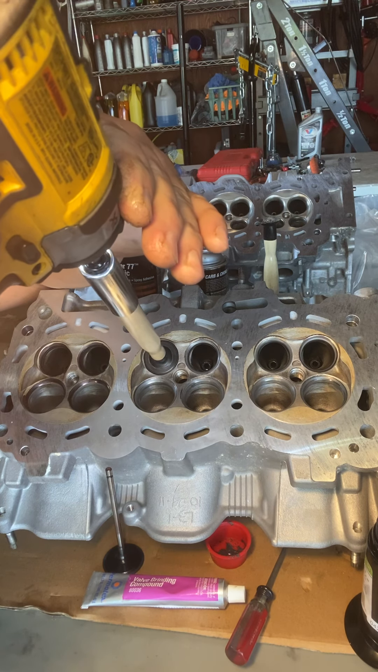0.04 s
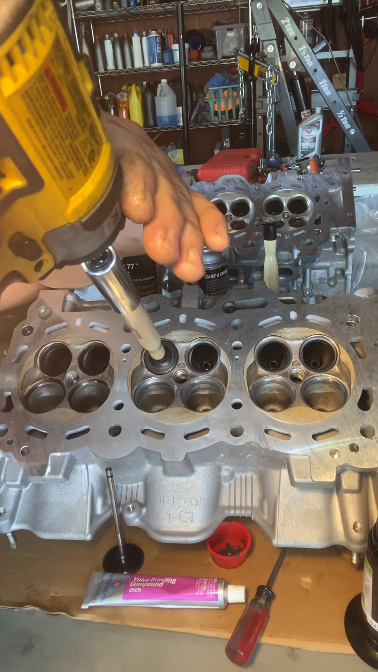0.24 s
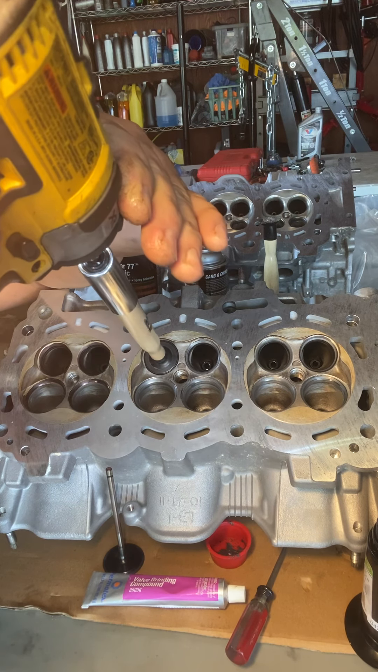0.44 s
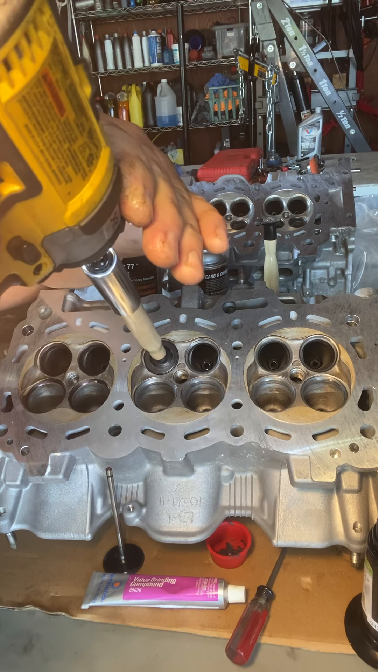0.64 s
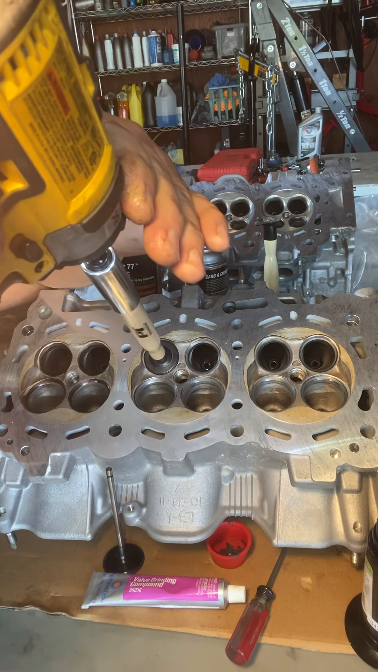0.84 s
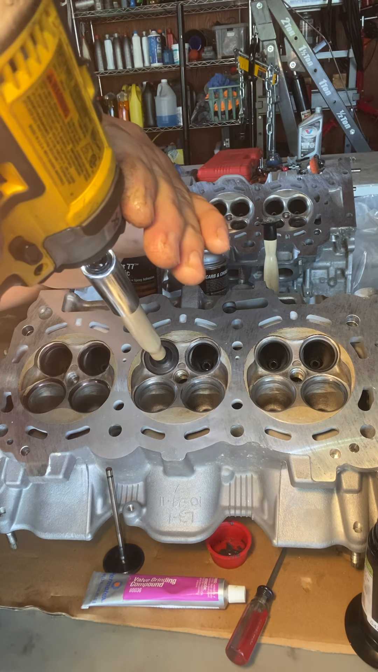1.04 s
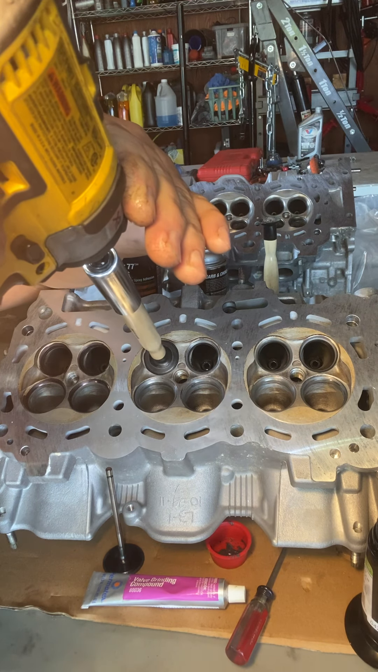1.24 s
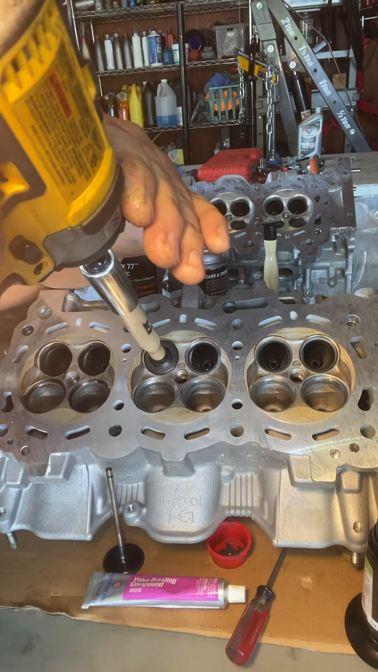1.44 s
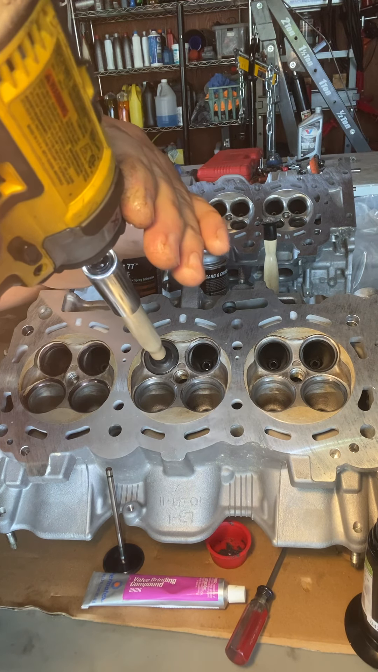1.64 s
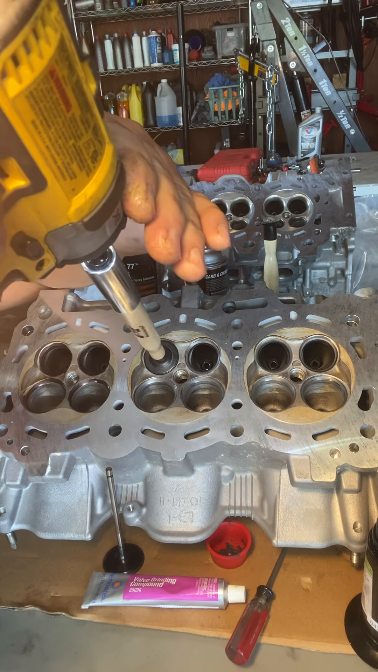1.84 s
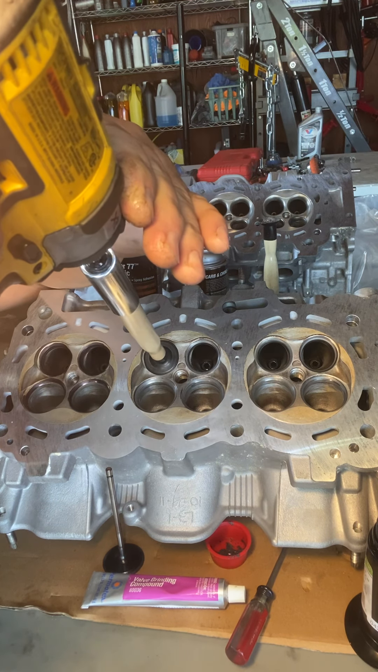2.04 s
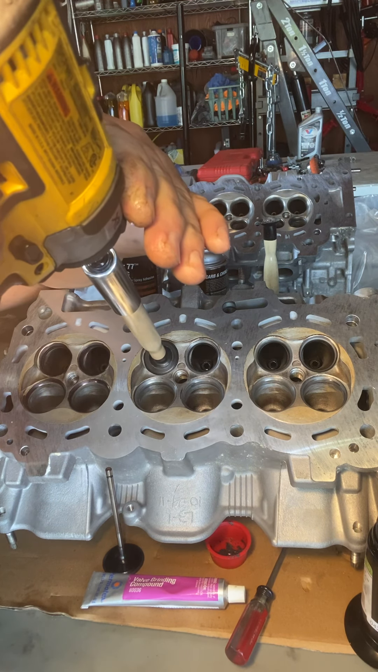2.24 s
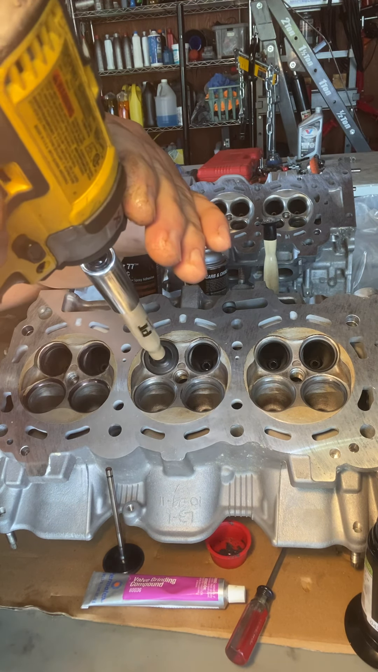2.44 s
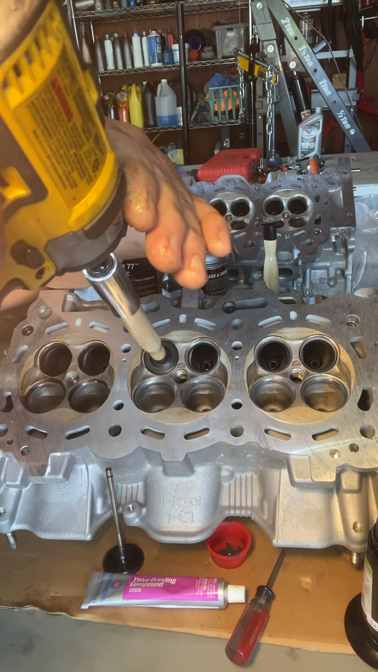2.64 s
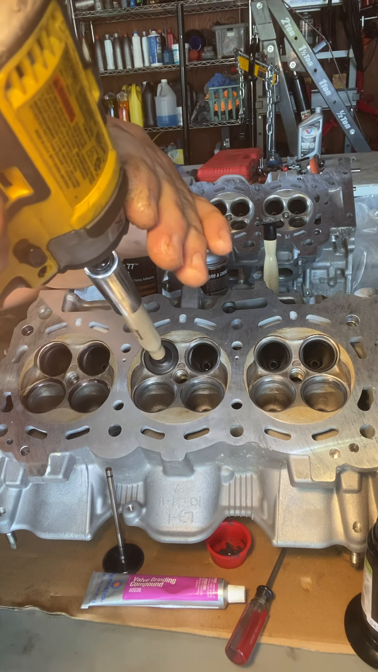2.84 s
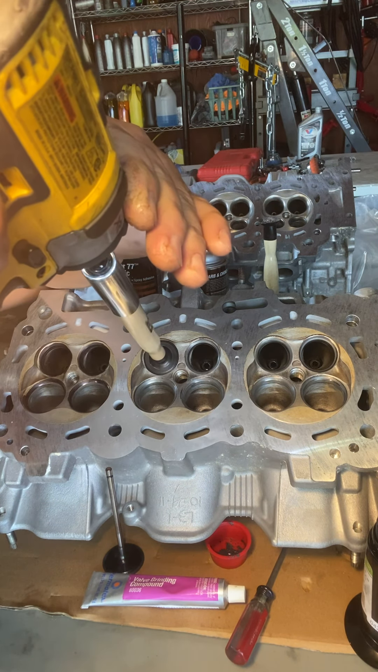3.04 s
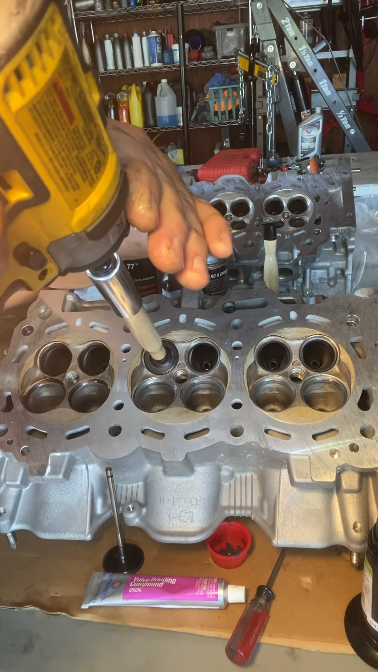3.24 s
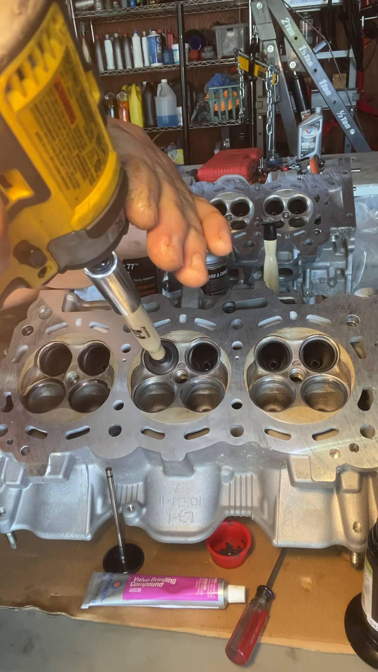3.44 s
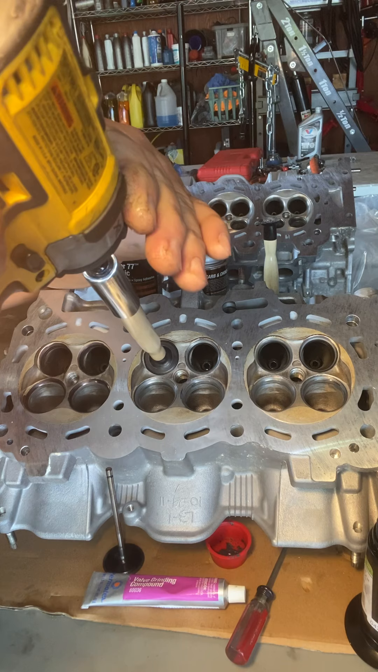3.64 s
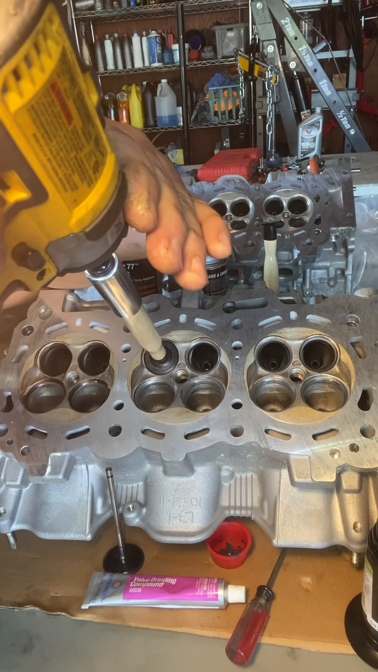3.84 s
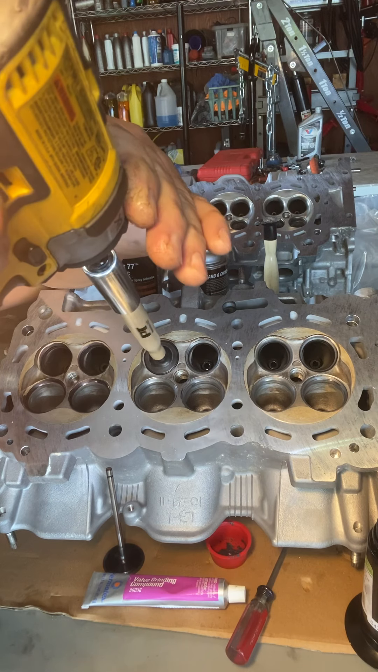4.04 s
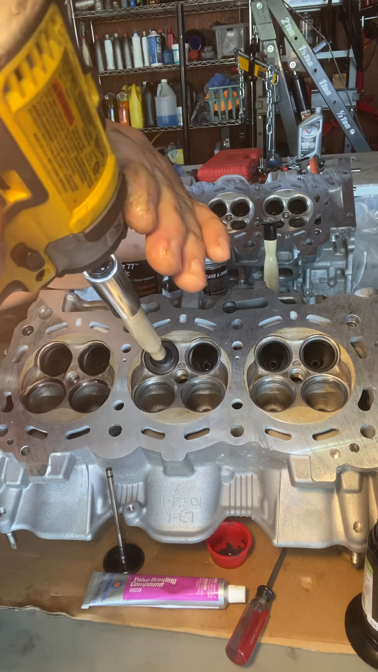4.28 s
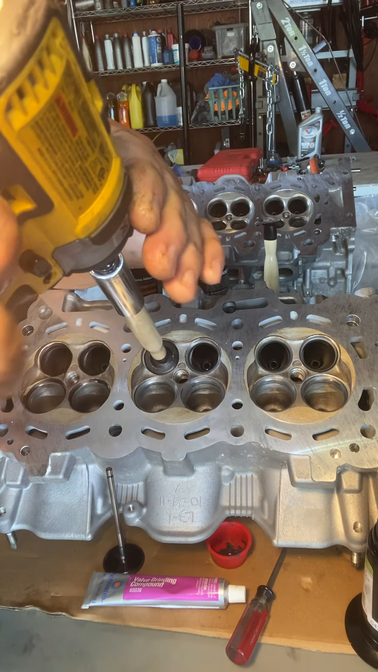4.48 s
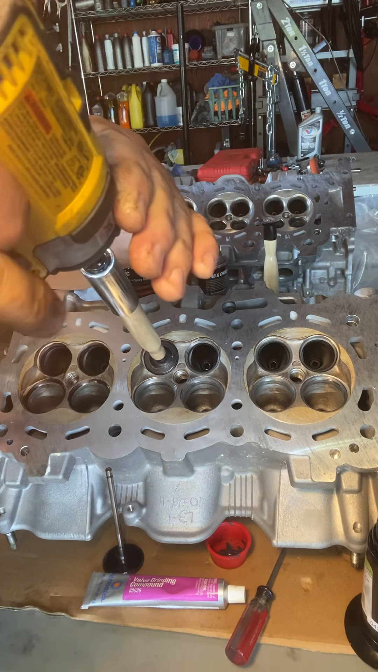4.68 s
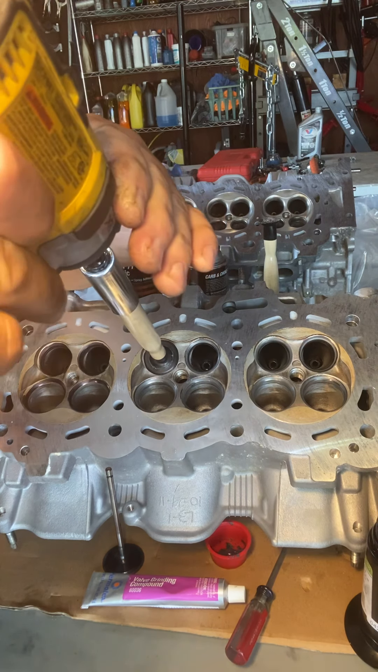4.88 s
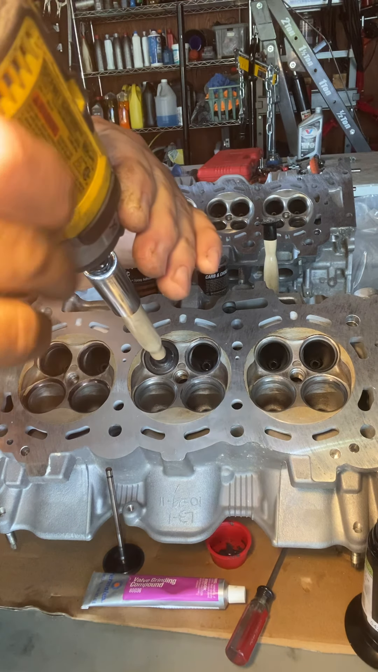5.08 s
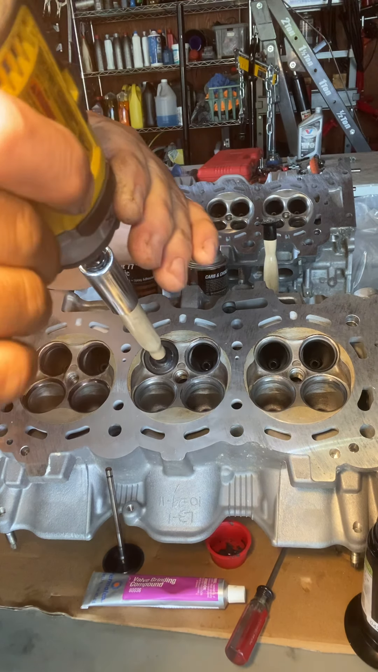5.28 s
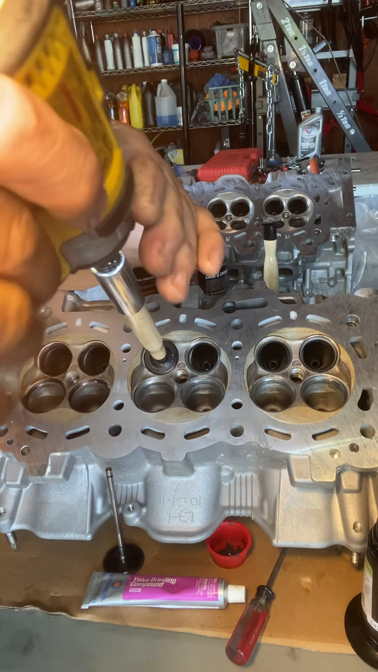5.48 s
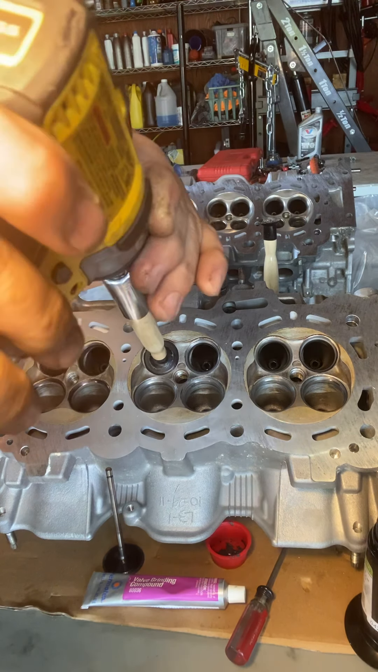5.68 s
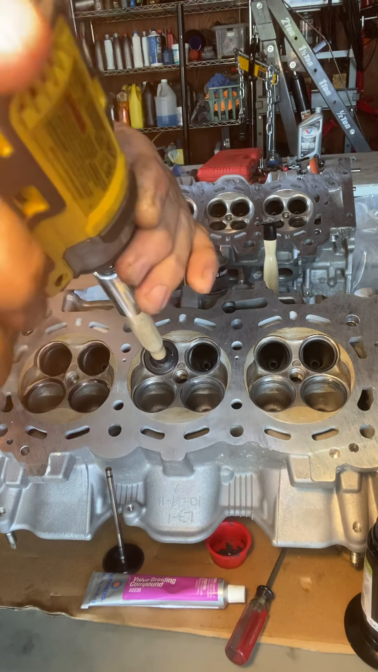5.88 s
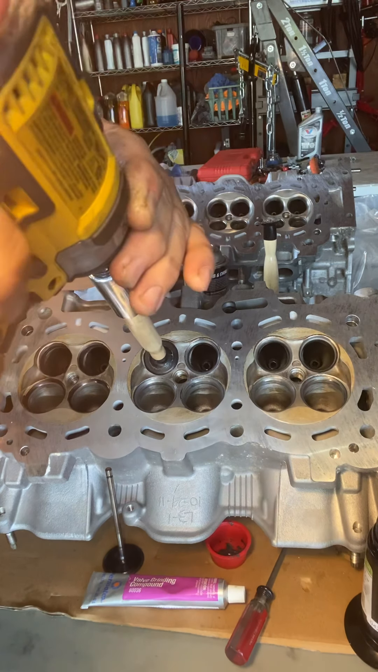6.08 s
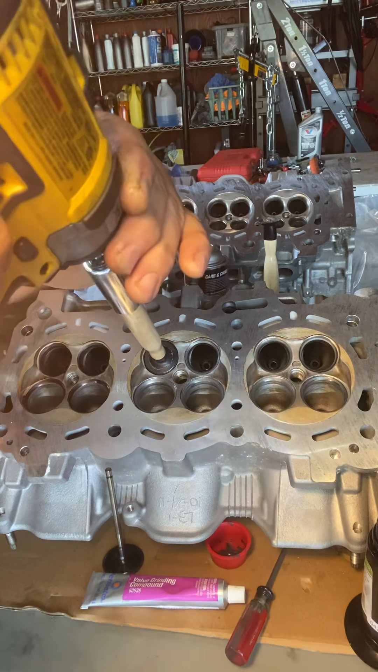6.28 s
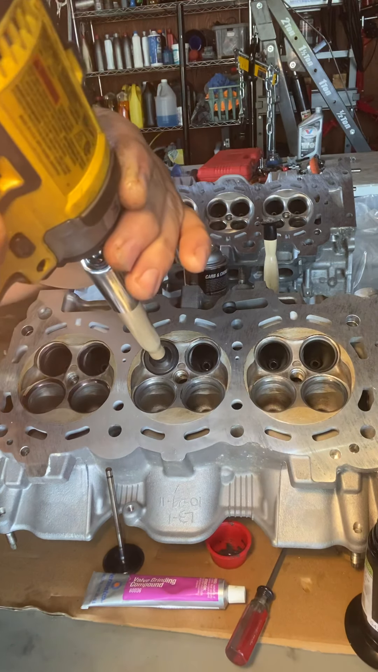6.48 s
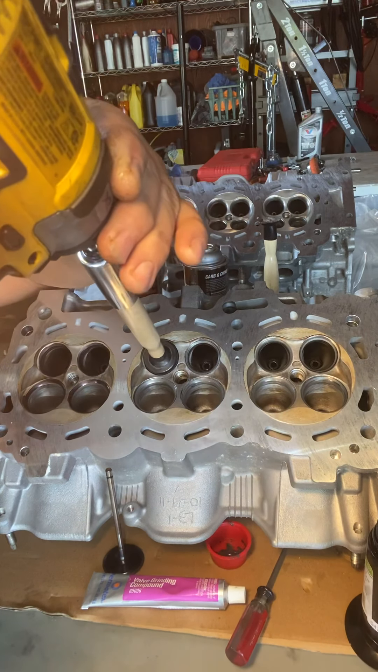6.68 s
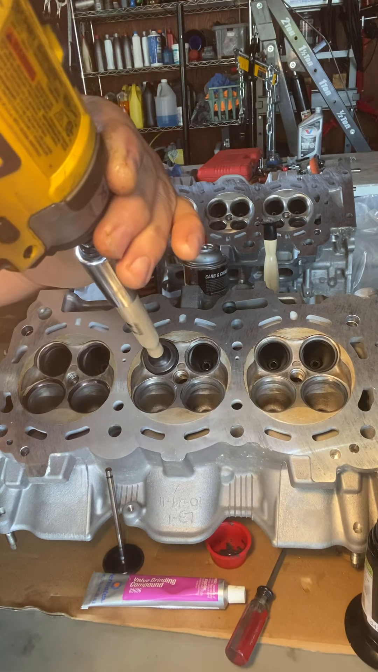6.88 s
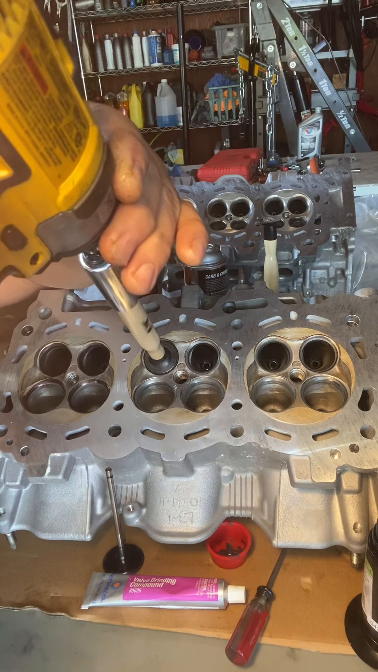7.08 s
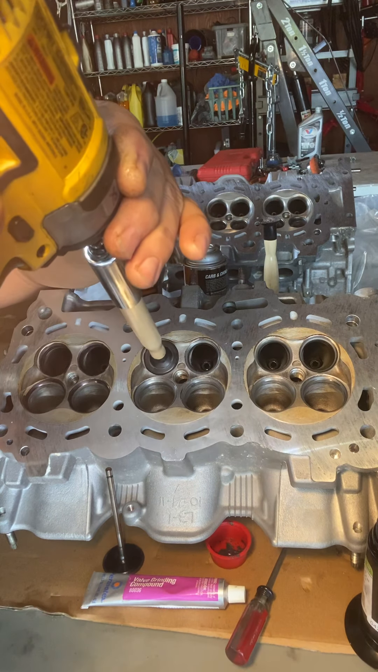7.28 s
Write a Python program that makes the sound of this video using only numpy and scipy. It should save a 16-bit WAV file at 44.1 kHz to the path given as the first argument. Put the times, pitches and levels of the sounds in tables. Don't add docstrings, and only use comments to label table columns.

```python
import sys
import numpy as np
from scipy import signal
from scipy.fft import rfft, irfft, next_fast_len
from scipy.io import wavfile
from scipy.ndimage import uniform_filter1d

SR = 44100
rng = np.random.default_rng(int(sys.argv[2]) if len(sys.argv) > 2 else 0)


def wav_out(sig):
    wavfile.write(sys.argv[1], SR, np.round(np.clip(np.atleast_2d(sig).T, -1, 1) * 32767).astype(np.int16))


def invert_db(level):
    return 10 ** (np.asarray(level, dtype=float) / 20)


N = 322812
M = next_fast_len(N + SR)
HZ = np.maximum(np.arange(M // 2 + 1) * SR / M, 1)
T = np.arange(N) / SR

# frequency in Hz, level in dB.
PORT_MID = [(9500, 0), (11400, -3), (12100, -19), (13600, -22), (16500, -46)]
# frequency in Hz, width in Hz, level in dB.
BRAKE = [(340, 120, -19.5), (776, 130, -14.5), (1008, 130, -5), (1313, 110, -4), (1620, 150, 0),
         (2100, 150, -10.5), (2535, 90, -5), (3550, 210, -10.5), (3876, 300, -6)]
SLIDER = [(340, 120, -11.5), (1005, 120, -5), (1320, 120, -4.5), (1626, 86, -1), (2220, 200, -5),
          (3050, 150, -7), (3560, 350, -5.5), (4800, 280, -17)]
DETENT = [(340, 100, -14), (1020, 170, -7.5), (1320, 88, -8), (1630, 99, -5.5), (1900, 97, -9.5),
          (2253, 93, -1), (3060, 93, -5), (3620, 320, -3), (4150, 180, -11), (4920, 300, -12)]
TRIGGER = [(365, 120, -11), (1060, 120, -8.5), (1720, 130, -6), (2280, 160, -2), (3350, 380, 3),
           (4100, 350, 2.5), (4830, 200, -9), (5390, 150, -7)]
TAP = [(1590, 400, 0), (3500, 400, -15)]
NUDGE = [(1600, 200, -8), (2270, 150, -3), (2580, 120, -4), (4060, 360, -7)]
# frequency in Hz, level in dB per Hz.
RATTLE = [(240, -16), (400, -10.5), (636, -9.5), (753, 2.5), (879, -7.5), (1110, -6.5), (1250, -12),
          (1350, -3.5), (2710, -13), (3990, -18), (5600, -20), (7500, -21), (10700, -28.5), (16000, -23.5)]


def unit(x):
    return x / np.sqrt(np.mean(x ** 2))


def along(table):
    hz, value = np.transpose(table)
    return np.interp(np.log(HZ), np.log(np.maximum(hz, 1)), value)


def shape(x, response):
    return irfft(rfft(x, M) * response, M)[..., :x.shape[-1]]


def low_pass(hz, order):
    return 1 / (1 + (HZ / hz) ** order)


def ring(hz, width):
    return 1 / (1 + 1j * (HZ - hz * hz / HZ) / width)


def body(modes):
    return sum((-1) ** k * invert_db(db) * ring(hz, width) for k, (hz, width, db) in enumerate(modes))


def played(table):
    s, *columns = np.transpose(table)
    gate = uniform_filter1d(1. * ((T >= s[0]) & (T <= s[-1])), size=88)
    return [gate] + [np.interp(T, s, c) for c in columns]


def bursts(rows):
    attack_s = 0.005
    out = np.zeros(N)
    for s, db, hold, fade in rows:
        fading = np.clip(T - s - attack_s - hold, 0, 10 * fade) / fade
        out += invert_db(db - 20 * fading) * np.clip((T - s) / attack_s, 0, 1)
    return out


def walk(rate):
    k = int(SR / rate)
    steps = np.repeat(rng.standard_normal(N // k + 1), k)
    return 1.1 * uniform_filter1d(uniform_filter1d(steps, k), k)[:N]


def round_turn(spots):
    high_spot_s = [-0.12, 0.41, 0.94, 1.46, 1.97, 2.5, 3.025, 3.565, 4.11, 4.66, 6.39, 6.535, 6.675, 6.8,
                   6.955, 7.11, 7.24, 7.38]
    turn = np.interp(T, high_spot_s, np.arange(len(high_spot_s)))
    out = 0
    for at, width, size in spots:
        away = (turn - at + .5) % 1 - .5
        out = out + size * np.exp(-np.abs(away / width) ** 4)
    return out


def teeth(turns, scatter_db, jitter):
    at = np.flatnonzero(np.diff(np.floor(turns)))
    chance = rng.standard_normal((N // 50, 2))[:len(at)]
    late = (jitter * SR * chance[:, 0]).astype(int)
    out = np.zeros(N)
    np.add.at(out, np.clip(at + late, 0, N - 1), invert_db(scatter_db * chance[:, 1]))
    return out


def flick(length, low_hz, high_hz):
    t = np.arange(256) / SR
    burst = rng.standard_normal(256) * np.exp(-t / length)
    band = signal.butter(2, [low_hz, high_hz], "bandpass", fs=SR, output="sos")
    burst = signal.sosfilt(band, burst)
    return burst / np.abs(burst).max()


def shop():
    # frequency in Hz, level in dB per Hz.
    room_tone = [(15, -70.5), (25, -22.5), (86, -7.5), (173, -24.5), (208, -26), (325, -28), (411, -26),
                 (548, -27.5), (750, -29), (833, -28.5), (1370, -33), (2200, -38), (3000, -50.5),
                 (5930, -58), (7700, -52.5), (13000, -78.5)]
    # frequency in Hz, left-right likeness from -1 to 1.
    likeness = [(60, 1.0), (130, 0.99), (290, 0.61), (640, -0.13), (1410, 0.29), (3100, -0.14),
                (6820, 0.56), (15000, -0.61)]
    mid, side = rng.standard_normal((2, N))
    alike = np.clip(along(likeness), -.99, .999)
    colour = invert_db(along(room_tone)) * np.abs(1 + 0.64 * ring(86.0, 2.4))
    mid = shape(mid, colour * np.sqrt(1 + alike))
    side = shape(side, colour * np.sqrt(1 - alike))
    return invert_db(-52.5) * unit(np.array([mid + side, mid - side]))


def paste():
    return unit(rng.standard_normal(N) * invert_db(0.38 * walk(1500) + 1.0 * walk(40)))


def grind():
    # frequency in Hz, level in dB per Hz.
    grit = [(120, -31.5), (200, -3.5), (620, -1), (800, 7), (1540, 0), (2060, -1), (2950, -4.5), (3570, -4),
            (3900, -2), (4350, -2.5), (4900, -6), (5300, -5), (5800, -2.5), (6330, -5.5), (6900, 0),
            (9200, -8.5), (11400, -8.5), (14200, -28.5), (15600, -45.5)]
    # frequency in Hz, width in Hz, level in dB.
    steel = [(2720, 41, -9), (3120, 22, -4), (3450, 20, -6), (3696, 14, 1), (3840, 26, -10),
             (4020, 29, -11), (4290, 60, -14), (4505, 16, -6), (4770, 14, -7), (5065, 14, -10),
             (5640, 15, -6), (5736, 14, -8), (5829, 14, 2), (5996, 20, -4), (6080, 20, -6), (6488, 20, -8),
             (6600, 18, -3), (6692, 20, 2), (7112, 50, -2), (6935, 20, -9), (7252, 15, -4), (7410, 20, -9),
             (7560, 20, -8), (7720, 38, -5), (8340, 57, -7), (8770, 25, -8), (8941, 18, 3), (9130, 25, -11),
             (9255, 20, -5), (9482, 40, -2), (9650, 31, -5), (10600, 85, -12), (10978, 30, -9),
             (11400, 52, -13), (11950, 60, -17), (12370, 50, -14), (12680, 50, -23), (12900, 69, -36)]
    force = paste()
    rings = np.zeros(N)
    for hz, width, db in steel:
        rings += invert_db(db + 2.3 * walk(6)) * shape(force, ring(hz, .5 * width))
    thin = invert_db(-10.5 * low_pass(1550, 8))
    bright = invert_db(-.8 * along(PORT_MID)) / (1 + (2300 / HZ) ** 4 + (HZ / 14000) ** 24)
    return unit(shape(force, thin * invert_db(along(grit)))), unit(shape(rings, bright))


def stem_ring():
    # frequency in Hz, width in Hz, level in dB.
    rocking_modes = [(2052, 66, 0), (2292, 14.5, -2.5)]
    return unit(shape(paste(), body(rocking_modes) * low_pass(4000, 4)))


def gear_knocks(turns):
    # frequency in Hz, width in Hz, level in dB.
    gearbox = [(472, 60, -32.5), (761, 63, 10), (1223, 184, 5.5)]
    # part of a turn, half width in turns, rise in dB.
    binding = [(0.02, 0.17, 12), (0.33, 0.082, 6), (0.58, 0.084, 10)]
    rocking = [(0.13, 0.15, 11.5), (0.63, 0.087, 16.5)]
    nose = [(0.14, 0.14, 6), (0.73, 0.06, 12)]
    knocks = teeth(turns, 1.0, 3e-5)
    knocks = knocks + invert_db(-10) * teeth(turns - .3, 2, 6e-5) + invert_db(-17) * teeth(turns - .64, 2, 1e-4)
    box = unit(shape(knocks, body(gearbox) / (1 + (HZ / 2300) ** 4 + (640 / HZ) ** 8)))
    head = unit(shape(knocks, ring(1970, 500)))
    front = unit(shape(knocks, ring(1418, 200) ** 2))
    gear = invert_db(-58 + 0.5 * T + round_turn(binding) + 0.99 * walk(7.4)) * box
    gear = gear + invert_db(-64 + 1.0 * T + round_turn(rocking)) * head
    return gear + invert_db(-64.5 + 0.5 * T + round_turn(nose)) * front


def lapping(hiss, stem):
    # time in seconds, knock rate in Hz, grit in dB, valve ring in dB above grit.
    slow_run = [
        (0.0, 105.4, -39, 7.5),
        (0.25, 104.7, -37.5, 3.5),
        (1.2, 102.5, -37, 3),
        (1.6, 102.2, -38.5, 0.5),
        (1.9, 102, -36.5, 0),
        (2.6, 100.2, -38.5, -3),
        (3.4, 99.3, -38.5, -7),
        (4.27, 97.25, -40, -14.5),
        (4.321, 97.4, -45.5, -19.5),
    ]
    # multiple of the knock rate, level in dB, drift in dB per second.
    hum_tones = [(2, -6, 0), (3, 0, -1.2), (4, -4, 0), (5, -6.5, 0), (6, -11, 0)]
    on, hz, grit_db, stem_db = played(slow_run)
    tight = round_turn([(0.02, 0.22, 1)])
    turns = np.cumsum(hz * (1 + 0.018 * (2 * tight - 1) + 0.0087 * walk(30))) / SR
    gear = gear_knocks(turns)
    high_hiss = shape(hiss, 1 / (1 + (11000 / HZ) ** 16))
    hiss = hiss + (invert_db(-13 + 3.5 * T) - 1) * high_hiss
    hiss = hiss * invert_db(1.0 * np.cos(2 * np.pi * (turns - .1)))
    hum = np.zeros(N)
    for k, db, drift_db in hum_tones:
        flicker_db = 3.0 * walk(8.116) + 3.0 * walk(28)
        hum += invert_db(db - 21.5 + 1.5 * tight + drift_db * T + flicker_db) * np.sin(2 * np.pi * k * turns)
    ring_db = stem_db + 0.44 * np.minimum(stem_db, 0)
    return on * (invert_db(grit_db) * (invert_db(-1.4) * hiss + invert_db(ring_db - 6.0) * stem + hum) + gear)


def lump_thumps():
    # time in seconds, peak in dB.
    thumps = [
        (1.649, -32.5),
        (2.175, -33),
        (2.664, -34.5),
        (3.217, -31),
        (3.739, -31.5),
    ]
    lumps = np.zeros(N)
    for s, db in thumps:
        start = int((s - 0.036) * SR)
        lumps[start:][:3072] += invert_db(db + 2.5) * rng.standard_normal(3072) * np.hanning(3072)
    return shape(lumps, ring(640, 800) ** 2)


def clack(peak_db, case_db, shell_db, crack_db, length):
    # frequency in Hz, width in Hz, level in dB.
    case_modes = [(340, 110, 2), (760, 150, 2.5), (1006, 160, -1.5)]
    shell_modes = [(1318, 360, -4), (1710, 160, -2), (2120, 170, -4)]
    latch_modes = [(3230, 300, -1.5), (3650, 400, -3.5), (4100, 550, -3.5)]
    crack_modes = [(5720, 650, 3.5), (6200, 500, 12.5), (7300, 600, 9.5), (8400, 900, -12),
                   (10300, 2000, -18)]
    t = np.arange(1024) / SR
    lengths = length * np.array([[1.0], [0.9], [0.6], [0.55]])
    chatter = rng.standard_normal((4, 1024)) * np.exp(-t / lengths) * np.minimum(t / 0.0009, 1)
    chatter = chatter + 2.5 * (np.arange(1024) == 24)
    chatter = chatter + invert_db(-16.5) * np.roll(chatter[::-1], int(0.0048 * SR), axis=1)
    levels = (case_db + 2.0, shell_db + 8.0, -5.5, crack_db + 0.5)
    out = np.zeros(1024)
    for modes, x, level_db in zip((case_modes, shell_modes, latch_modes, crack_modes), chatter, levels):
        part = np.zeros(1024)
        for hz, width, db in modes:
            part += invert_db(db) * signal.lfilter(*signal.iirpeak(hz, hz / width, SR), x)
        out += invert_db(peak_db + level_db) * part / np.abs(part).max()
    return out


def handling():
    # time in seconds, peak in dB, shell ring in dB, crack in dB.
    ticks = [(4.3203, -35, -9, -4), (4.4513, -54, -20, 5.5), (4.4545, -51, -20, 11), (4.4605, -58, -20, 10),
             (5.101, -48, -9, -21), (4.515, -43, -10, -19), (4.5497, -43.5, -19, -14),
             (4.916, -53, -19, -6), (4.958, -37, -15, -8), (4.9658, -49.5, 5.5, -15),
             (5.144, -44.5, -6.5, -1), (5.869, -39, -19, -13), (6.095, -54, -0.5, -10),
             (6.199, -55, -3, -10), (7.1046, -34, -21, -16)]
    # time in seconds, peak in dB.
    first_teeth = [(6.2633, -20.5), (6.263, -35), (6.2737, -25), (6.2885, -22), (6.292, -36), (6.303, -28),
                   (6.312, -45), (6.3258, -35), (6.333, -32), (6.3403, -31), (6.3476, -34), (6.3624, -36),
                   (6.3698, -40), (6.3768, -40)]
    # time in seconds, peak in dB, housing thud in dB, shell ring in dB, crack in dB.
    clacks = [
        (6.383, -18.5, -37, -30, 0),
        (6.3853, -15, -17, -20, -5),
        (6.39, -27, -10, -6.5, -6),
    ]
    hits = [(*row, 0.0025) for row in clacks]
    hits += [(s, db, -16, shell_db, crack_db, 0.0026) for s, db, shell_db, crack_db in ticks]
    hits += [(s, db, -21.5, -20, -12, 0.0026) for s, db in first_teeth]
    out = np.zeros(N + 1024)
    for s, *hit in hits:
        out[int(s * SR):][:1024] += clack(*hit)
    return out[:N]


def edge_contacts():
    # time in seconds, peak in dB.
    contacts = [(4.3242, -24.5), (4.3236, -7), (4.325, -24.5), (4.326, -19.5), (4.3272, -22.5),
                (4.329, -32), (5.2082, -14.5), (5.21, -24), (5.2108, -29), (5.2143, -23.5), (5.232, -21),
                (5.2325, -23), (5.2341, -12), (5.2349, -20), (5.236, -16), (5.2387, -30.5), (5.2403, -24),
                (5.4435, -42), (5.4462, -16.5), (5.448, -24.5), (5.4492, -25), (5.4532, -30)]
    out = np.zeros(N + 256)
    for s, db in contacts:
        touch = flick(0.00016, 4700, 8600) + invert_db(-12) * flick(0.00016, 8500, 14000)
        out[int(s * SR):][:256] += invert_db(db) * touch
    return out[:N]


def blow(peak_db, push, modes, spread):
    t = np.arange(1024) / SR
    rings = np.zeros(1024)
    for hz, width, db in modes:
        decay = np.exp(-np.pi * spread * width * t)
        rings += invert_db(db) * width * decay * np.sin(2 * np.pi * (hz * t + rng.random()))
    rings = rings * (1 - np.exp(-(t * spread / push) ** 2))
    return invert_db(peak_db) * rings / np.abs(rings).max()


def switching(spread):
    # time in seconds, peak in dB, push in seconds, part that rings.
    struck_parts = [(4.3227, -5.5, 0.0013, BRAKE), (4.3252, -16.5, 0.001, BRAKE),
                    (4.329, -25.5, 0.0008, BRAKE), (5.2075, -16.5, 0.00065, SLIDER),
                    (5.214, -33, 0.00088, SLIDER), (5.2319, -14.5, 0.0011, DETENT),
                    (5.2395, -28, 0.0008, DETENT), (5.4425, -40, 0.002, TRIGGER),
                    (5.4455, -17, 0.00094, TRIGGER), (5.452, -33, 0.00066, TRIGGER),
                    (5.457, -39, 0.001, TRIGGER), (6.1984, -37, 0.0007, TAP), (4.9569, -38.5, 0.002, NUDGE)]
    out = np.zeros(N + 1024)
    for s, *struck in struck_parts:
        out[int(s * SR):][:1024] += blow(*struck, spread)
    return out[:N]


def shifting(hiss):
    # time in seconds, level in dB, hold in seconds, fade in seconds per 20 dB.
    nudged = [
        (4.335, -46, 0.002, 0.055),
        (5.87, -63.5, 0.05, 0.06),
        (6.1, -63, 0.07, 0.25),
    ]
    scrapes = [
        (4.7, -81, 0.24, 0.03),
        (4.83, -75, 0.05, 0.1),
        (4.968, -63, 0.008, 0.035),
        (5.04, -67, 0.06, 0.015),
        (5.15, -74, 0.04, 0.03),
        (5.53, -65, 0.05, 0.05),
        (5.655, -76, 0.16, 0.1),
        (5.85, -62, 0.012, 0.03),
        (5.868, -57, 0.012, 0.075),
        (6.091, -60, 0.008, 0.14),
    ]
    whistles = [
        (4.98, -83, 0.14, 0.05),
        (5.58, -83, 0.05, 0.6),
        (5.85, -75, 0.04, 0.06),
        (5.995, -75.5, 0.09, 0.01),
    ]
    grip = [
        (5.64, -72.5, 0.0256, -1.5),
        (5.79, -50, 0.01, 0.3),
        (5.92, -57, 0.0275, 0.5),
        (6.2, -53.5, 0.14, 0.2),
        (6.58, -56.5, 0.02, 0.9),
        (6.69, -47.5, 0.03446, 1),
        (6.95, -59, 0.4, -2.2),
    ]
    # frequency in Hz, level in dB.
    linger_modes = [(3700, -3), (2010, -7.5), (2720, -13), (5640, -10.5), (5990, -10), (7500, -13)]
    lingering = np.zeros(N)
    for hz, db in linger_modes:
        lingering += invert_db(db - 3.5 + 1.5 * walk(40)) * np.sin(2 * np.pi * hz * T)
    lingering = bursts(nudged) * lingering
    whine = bursts(whistles) * invert_db(-2.0) * unit(shape(paste(), ring(7480, 92) ** 2))
    thuds = bursts(grip) * invert_db(-5.5) * unit(shape(rng.standard_normal(N), ring(136, 149) ** 2))
    return bursts(scrapes) * invert_db(-1.5 + 3.0 * walk(50)) * hiss + lingering + whine + thuds


def creeping():
    # time in seconds, scrape in dB.
    creep = [
        (6.26, -47),
        (6.316, -46.5),
        (6.395, -51.5),
    ]
    on, creep_db = played(creep)
    return on * invert_db(creep_db - 4.0) * unit(shape(paste(), invert_db(along(RATTLE))))


def spinning():
    # time in seconds, motor tone in Hz, rattle in dB, chuck ring in dB above rattle.
    fast_run = [
        (6.395, 285.5, -42, -6),
        (6.435, 325.7, -45, 3),
        (6.49, 356.3, -44.5, 7),
        (6.56, 369.5, -46, 2),
        (6.68, 371.4, -44, -9),
        (6.78, 364.5, -44, 17),
        (6.95, 371.2, -44.5, -10),
        (7.03, 371.8, -46, 14),
        (7.32, 340, -41, -1.5),
    ]
    on, hz, rattle_db, chuck_db = played(fast_run)
    run_up_db = -14 * np.exp(-np.maximum(T - fast_run[0][0], 0) / 0.035)
    beat = 1.02 - 0.42 * np.cos(2 * np.pi * 11.2 * (T - 6.9))
    tone_db = -51 + run_up_db + 20 * np.log10(beat)
    octave_db = -67 + 2 * run_up_db + round_turn([(0.0, 0.22, 23)])
    turns = np.cumsum(hz * (1 + .006 * walk(60))) / SR
    tone = invert_db(tone_db + 1.8 * walk(35)) * np.sin(2 * np.pi * turns)
    overtones = np.sin(4 * np.pi * turns) + invert_db(-1.5) * np.sin(6 * np.pi * turns)
    tone = tone + invert_db(octave_db + 0.87 * walk(45)) * overtones
    knocks = teeth(turns / 2, 2.0, .0003)
    knocks = knocks + invert_db(-9 + 4 * walk(12)) * teeth(turns / 2 + .5, 3, .0003)
    decays = signal.lfilter([1], [1, -np.exp(-1 / (.0008 * SR))], knocks)
    puffs = (decays + 0.29) * rng.standard_normal(N)
    low = low_pass(2600, 4)
    rattle = invert_db(1.0 + 5.2 * walk(20)) * unit(shape(puffs, (1 - low) * invert_db(along(RATTLE))))
    whirr = unit(shape(unit(puffs) + 1.66 * paste(), low * invert_db(along(RATTLE))))
    rattle = rattle + invert_db(-0.5) * whirr
    chuck = invert_db(chuck_db - 23.0 + 1.3 * walk(21)) * unit(shape(puffs, ring(3700, 1060) ** 2))
    return on * (tone + invert_db(rattle_db) * (rattle + chuck))


def rapping():
    # time in seconds, peak in dB, treble in dB.
    raps = [(6.4175, -31, 4), (6.4232, -28, -5), (6.4303, -27, -5), (6.4362, -28, -7.2),
            (6.4423, -30.7, -2), (6.4481, -32, -9.3), (6.461, -39, -9.0), (6.4653, -37, -6),
            (6.4764, -35.5, -5), (6.4818, -38, -11), (6.4984, -32.4, -8), (6.5038, -32, -6.3),
            (6.5093, -36.3, -7), (6.5365, -34, -2), (6.5445, -36, -7.0), (6.5502, -30, -1),
            (6.5554, -35.1, -3), (6.561, -33.9, 5), (6.5661, -34, -4), (6.581, -35, -9.6),
            (6.587, -34.6, -6), (6.623, -39, -0.7), (6.6286, -35.5, -3.7), (6.6337, -41, -2.7),
            (6.6656, -32.5, -9.8), (6.6734, -33, -7), (6.7103, -31, 0), (6.7215, -33.1, -6.8),
            (6.7269, -32.4, -5.2), (6.744, -34, -4.1), (6.7606, -33, -9), (6.7659, -27, -12),
            (6.7713, -27.4, -9.4), (6.777, -33.7, -7), (6.7875, -34.5, -3.5), (6.8033, -31.5, -12.0),
            (6.812, -33.4, -5.6), (6.817, -34.0, -3), (6.8443, -32, 0), (6.87, -32, -2), (6.8861, -35.0, 0),
            (6.908, -36, -3.5), (6.9228, -35, -9), (6.9279, -39, -3.5), (6.9976, -37, -0.2),
            (7.003, -34.7, -4.1), (7.0138, -29, -9.2), (7.0189, -32.8, -11), (7.0357, -31, -6.2),
            (7.0405, -29, -6.6), (7.0731, -31, 1), (7.1204, -34, 1), (7.1753, -33, -2), (7.2166, -31, 0.1),
            (7.234, -32, -1), (7.241, -30, -4.0), (7.2906, -23, -11), (7.2964, -27, -2.4), (7.303, -21, -7),
            (7.3098, -20, -6.7)]
    length = 0.00043
    out = np.zeros(N + 256)
    for s, db, treble_db in raps:
        rap = flick(length, 3360, 4260)
        rap = rap + invert_db(treble_db - 1) * flick(length, 5000, 15000)
        rap = rap + invert_db(-9) * flick(length, 1450, 2600)
        out[int(s * SR):][:256] += invert_db(db) * rap
    return out[:N]


def reseating(hiss, stem):
    # time in seconds, grit in dB, valve ring and low valve ring in dB above grit.
    touchdown = [
        (7.101, -65, 4.5, -2),
        (7.105, -37, -1.5, -11),
        (7.278, -34, -7, -10),
        (7.306, -32, -2, -14),
        (7.32, -33, -16, -6),
    ]
    # frequency in Hz, width in Hz, level in dB.
    bending_modes = [(1030, 41, 3), (796, 56, -8.5)]
    on, grit_db, stem_db, low_db = played(touchdown)
    low = unit(shape(paste(), body(bending_modes) * low_pass(2500, 4)))
    return on * invert_db(grit_db) * (invert_db(-3.0) * hiss + invert_db(stem_db + 2.0) * stem + invert_db(low_db + 9.5) * low)


def echo(x):
    # frequency in Hz, decay time to -60 dB in seconds, level in dB.
    room = [(335, 0.075, -21), (1020, 0.35, -43), (1594, 0.28, -47.5), (2400, 0.29, -36.5),
            (3455, 0.31, -34.5), (5240, 0.25, -41), (7600, 0.3, -37), (10500, 0.3, -37)]
    t = np.arange(SR // 2) / SR
    tail = np.zeros((2, len(t)))
    for hz, t60, db in room:
        band = shape(rng.standard_normal((2, len(t))), ring(hz, 0.86 * hz) ** 2)
        tail += invert_db(db - 60 * t / t60 - 6.5) * band
    return shape(x, rfft(tail * (t > .004), M)) * invert_db([[0], [-4.5]])


def two_ports(valve, running, hands, far_blows, blows):
    # frequency in Hz, level in dB.
    port_side = [(60, -31), (200, -35), (700, -12), (1300, -13), (2400, -5), (3300, -7), (4400, -22.5),
                 (7000, -29), (7700, -9.5), (9000, -3), (11500, -2), (14300, -2.5), (15300, -19),
                 (16500, -55)]
    # frequency in Hz, left minus right in dB.
    port_db = [(60, 0), (430, -0.2), (700, 3.8), (1290, 2.4), (2380, 1.7), (4400, 0.4), (8120, 0.1),
               (15000, 0)]
    near = valve + running + hands + blows
    size = invert_db(along(port_side))
    lean = np.clip(np.tanh(along(port_db) * np.log(10) / 40), -size, size)
    mid, side = echo(near - blows + far_blows)
    mid = shape(valve + mid, invert_db(along(PORT_MID)))
    mid = mid + shape(running, invert_db(0.65 * along(PORT_MID)))
    mid = mid + shape(hands + blows, invert_db(0.4 * along(PORT_MID)))
    side = shape(side, np.minimum(6.0 * size, 1))
    side = side + shape(near, lean - 1j * np.sqrt(size ** 2 - lean ** 2))
    glints = unit(rng.standard_normal((2, 4096)) * np.exp(-T[:4096] / 0.018)) / np.sqrt(4096)
    scattered = shape(near, invert_db(-4) * size * rfft(glints, M))
    turning = 2 * np.pi * 1.7 * T
    side = side + np.sum(scattered * [np.cos(turning), np.sin(turning)], axis=0)
    return np.array([mid + side, mid - side])


def scene():
    hiss, rings = grind()
    stem = stem_ring()
    valve = lapping(hiss + invert_db(4.0 - 0.79 * T) * rings, stem)
    valve = valve + shifting(hiss + invert_db(-8.0) * rings)
    valve = valve + reseating(hiss + invert_db(1.5) * shape(rings, ring(6200, 2600)), stem)
    running = shape(creeping() + spinning(), low_pass(11400, 8)) + rapping()
    running = shape(running, low_pass(16000, 24))
    hands = lump_thumps() + handling() + edge_contacts()
    far_blows = invert_db(4.0) * switching(3.6)
    return two_ports(valve, running, hands, far_blows, switching(0.99)) + shop()


def top_cut(x):
    return signal.sosfilt(signal.butter(12, 16670, fs=SR, output="sos"), x)


def record(dry):
    mix = shape(dry, low_pass(16500, 100))
    return top_cut(mix)


dry = scene()
out = record(dry)
wav_out(out)
```